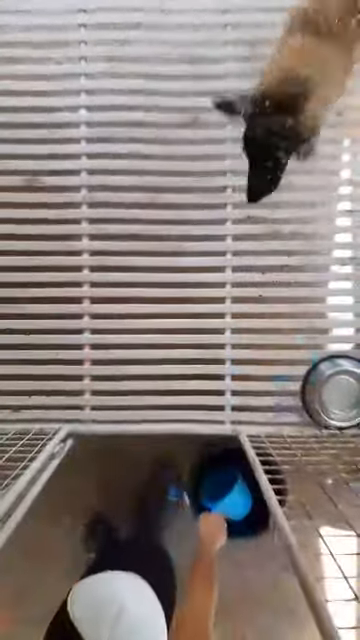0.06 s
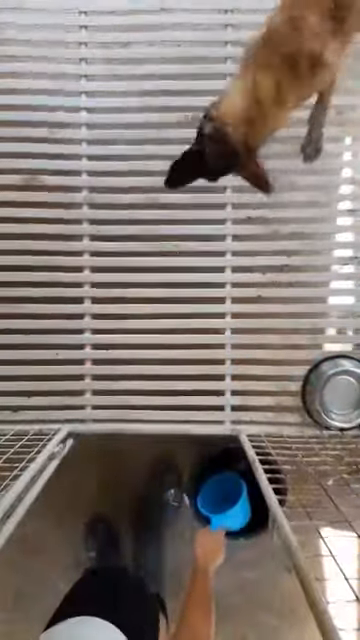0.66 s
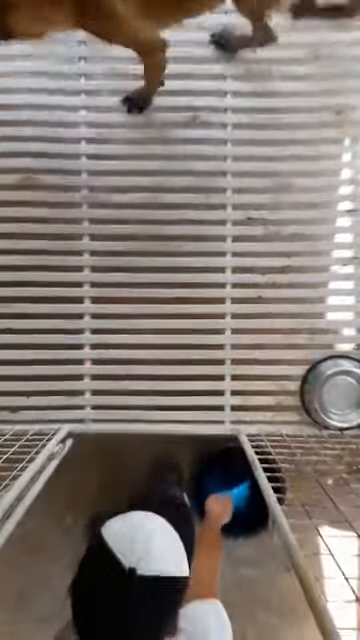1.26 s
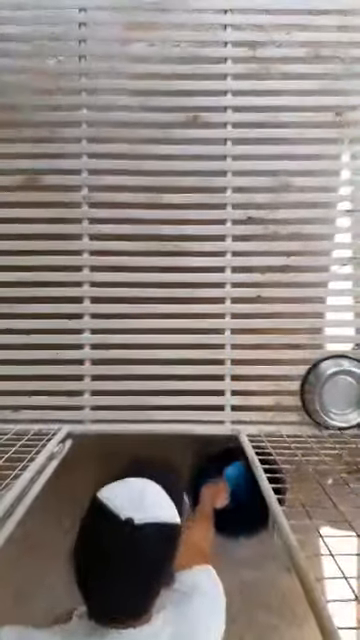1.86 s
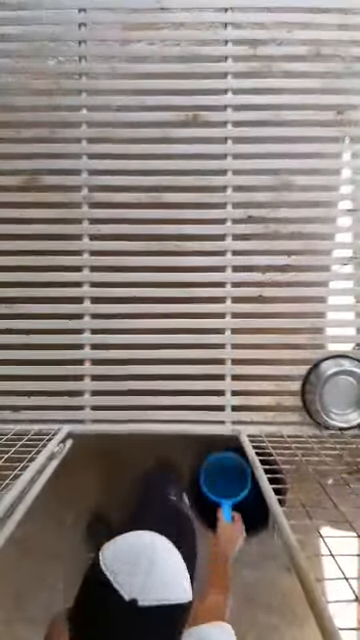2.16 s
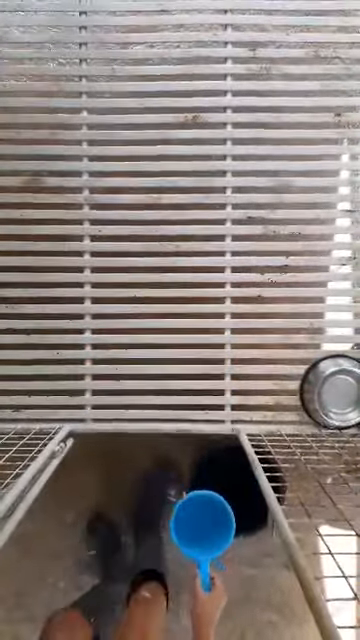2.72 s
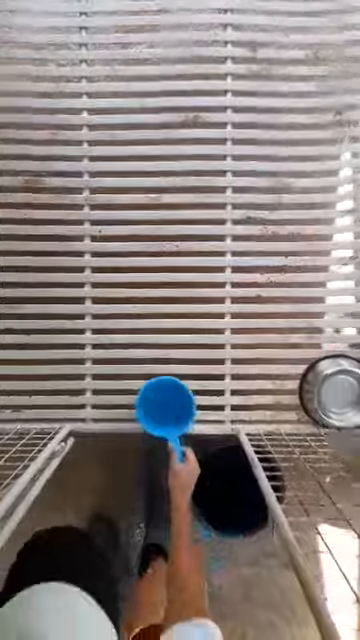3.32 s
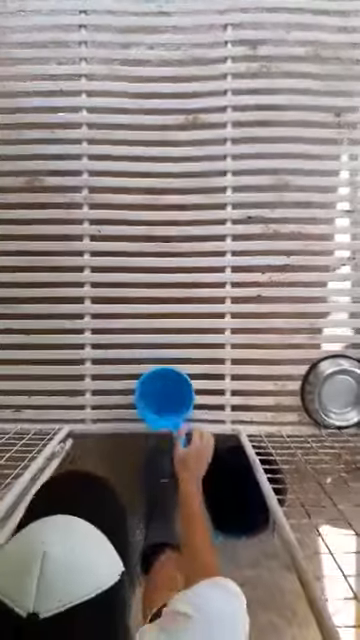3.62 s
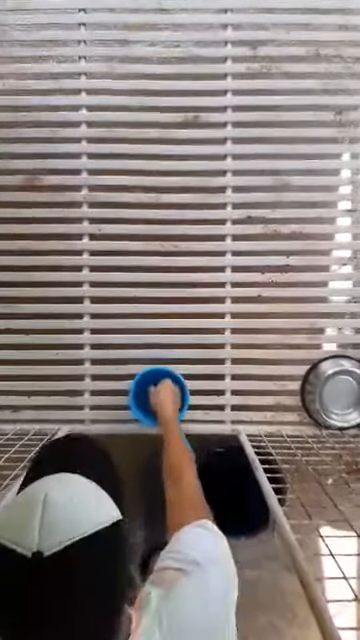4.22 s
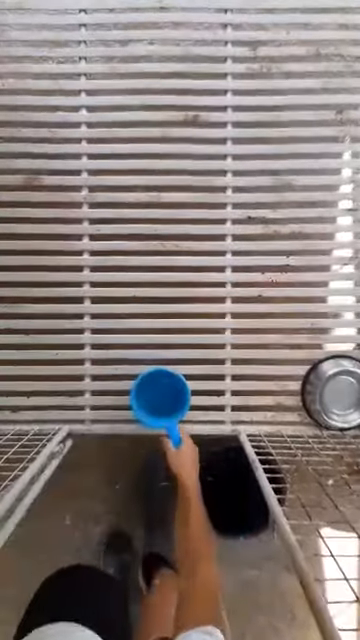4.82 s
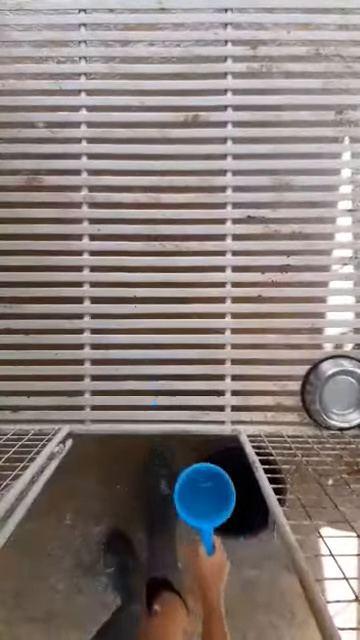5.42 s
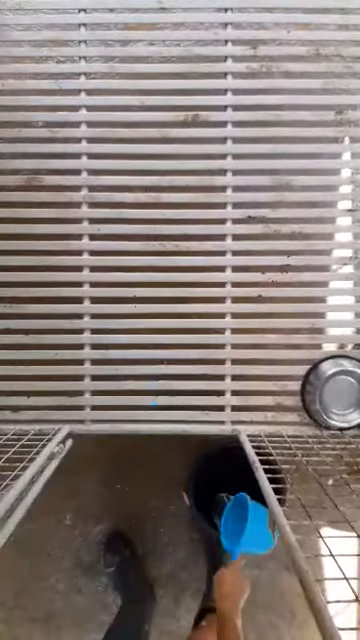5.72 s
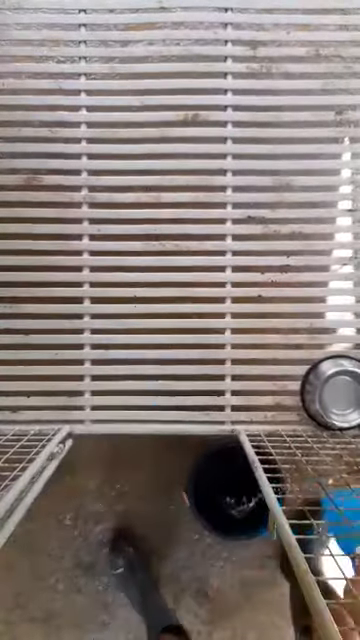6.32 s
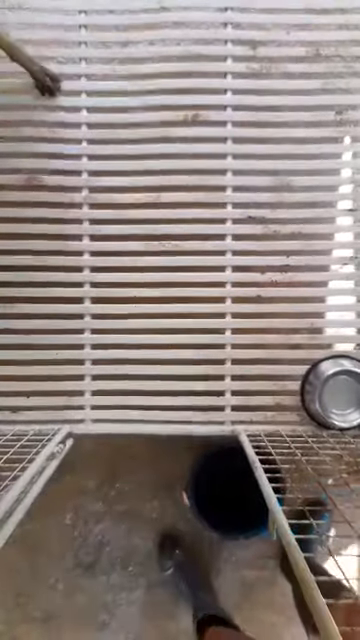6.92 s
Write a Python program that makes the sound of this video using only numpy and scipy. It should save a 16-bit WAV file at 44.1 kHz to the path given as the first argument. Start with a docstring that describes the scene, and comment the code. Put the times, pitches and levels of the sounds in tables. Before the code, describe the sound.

Close by in a roofed outdoor kennel, a dog barks once after a run of dry taps and trails into a whine. Water slops softly as a plastic scoop dips into a bucket. Two sharp barks follow, then a brief scrape and faint panting. Two more barks come as thrown water spatters, the scoop knocks and soft steps thud on the slatted floor. A phone's stereo microphones catch a low, wavering hum underneath.

```python
"""A roofed outdoor kennel, heard on a phone's stereo microphones, close to a dog that yelps five times.
Each bark leaps to a clean tone and breaks into a rasp; a whine trails the first, and the walls ring.
Someone scoops water from a bucket: bubbles slop, the plastic scoop knocks and scrapes, a throw spatters.
Around them are rapid dry taps, faint panting, scuffs and steps on the slatted floor, and, under the
open air, a low, wavering hum."""
import sys
import numpy as np
from scipy import signal
from scipy.fft import rfft, irfft, next_fast_len
from scipy.io import wavfile
from scipy.ndimage import uniform_filter1d, minimum_filter1d

SR = 44100
rng = np.random.default_rng(int(sys.argv[2]) if len(sys.argv) > 2 else 0)


def dump_mix(stems):
    """Bounce the given channels to the path in sys.argv[1] as a 16-bit WAV at rate SR."""
    frames = np.atleast_2d(stems).T  # one column per channel
    limited = np.clip(frames, -1, 1)  # hard clip at full scale
    pcm = np.round(limited * 32767).astype(np.int16)
    wavfile.write(sys.argv[1], SR, pcm)


N = 307377
T = np.arange(N) / SR
SIDES = np.array([[1], [-1]])  # left and right microphone

# resonances of the dog's throat and muzzle (frequency [Hz], gain [dB])
THROAT = [(400, -16.5), (620, -8), (820, -7), (1050, 0), (1380, -4), (1650, -2.5), (1900, -1.5),
          (2250, -4.5), (2550, -0.5), (2850, -3.5), (3150, -20.5), (3450, -14), (3750, -28.5),
          (4200, -27.5), (4800, -38), (6800, -26.5), (8500, -43.5), (11200, -22), (14000, -45.5)]


def undb(db):
    """Decibels to gain."""
    return 10 ** (np.asarray(db) / 20)


def unit(x):
    """Scale to rms 1."""
    return x / np.sqrt(np.mean(np.abs(x) ** 2) + 1e-20)


def blend(a, b, share):
    """From a to b as share goes from 0 to 1."""
    return a + (b - a) * share


def ease(t, middle, length):
    """A smooth step from 0 to 1."""
    return .5 + .5 * np.sin(np.pi * np.clip((t - middle) / length, -.5, .5))


def curve(rows, t=T):
    """Each column of a table, joined by straight lines in time."""
    s, *columns = np.transpose(rows)
    return [np.interp(t, s, c) for c in columns]


def read(points, hz):
    """A table over frequency, read on a log axis."""
    f, value = np.transpose(points)
    return np.interp(np.log(np.maximum(hz, 1)), np.log(f), value)


def shape(x, points):
    """Pass a sound through a response of (frequency [Hz], gain [dB]) points."""
    size = next_fast_len(x.shape[-1])
    gain = undb(read(points, np.fft.rfftfreq(size, 1 / SR)))
    return irfft(rfft(x, size) * gain, size)[..., :x.shape[-1]]


def colour(x, points):
    """Shape a sound's spectrum; rms 1."""
    return unit(shape(x, points))


def flutter(hz, size):
    """Random complex motion slower than hz; rms 1."""
    f = np.fft.rfftfreq(SR // 2, 1 / SR)
    real, imag = irfft(rfft(rng.standard_normal((2, SR // 2))) / (1 + (f / hz) ** 8))[:, :size]
    return unit(real + 1j * imag)


def walk(rate):
    """Random levels, rate of them a second, joined smoothly; rms 1."""
    size = int(SR / rate)
    knots = rng.standard_normal(N // size + 2)
    joined = np.interp(np.arange(N) / size, np.arange(len(knots)), knots)
    return unit(uniform_filter1d(joined, size // 2))


def wavering_phase(hz, depth, waver_hz, size):
    """Phase of an oscillation whose pitch strays at random around hz."""
    return 2 * np.pi * np.cumsum(hz * (1 + depth * flutter(waver_hz, size).real)) / SR


def stereo_noise(side_db, size=N):
    """Noise at the two microphones; side_db sets its width, as side against mid."""
    mid, side = rng.standard_normal((2, size))
    return unit(mid + undb(side_db) * SIDES * side)


def add(out, s, x):
    """Mix a short sound in at s seconds."""
    start = max(int(s * SR), 0)
    out[:, start:start + x.shape[-1]] += x[..., :N - start]


def ringing(modes, t):
    """Damped modes after a blow, each starting at its own phase."""
    return sum(undb(db - 60 * t / t60) * np.sin(2 * np.pi * (hz * t + rng.random()))
               for hz, db, t60 in modes)


def bursts(rows, spectrum, rise_s, gain_db, grain_db):
    """Each contact is a clump of grainy noise that swells and dies away."""
    envelope = np.zeros(N)
    for s, db, length_s in rows:
        age = np.maximum(T - s + rise_s, 0)
        swell = 1 - np.exp(-(age / rise_s) ** 2)
        envelope += undb(db + gain_db) * swell * np.exp(-np.minimum(2 * age / length_s, 40))
    return envelope * colour(stereo_noise(-0.86) * undb(grain_db * walk(650)), spectrum)


def low_tones(levels, modes, gain_db, waver_db):
    """Steady tones that waver in pitch and strength."""
    tones = 0
    for hz, width_hz, db in modes:
        phase = 2 * np.pi * np.cumsum(hz + width_hz / 2 * walk(30)) / SR
        tones = tones + undb(db + waver_db * walk(25)) * np.sin(phase)
    return unit(tones) * undb(curve(levels)[0] + gain_db)


def hum(throb_db=1.5, first_throb_s=.12, throb_gap_s=.246):
    """An evenly throbbing hum over a deeper drone, the same at both microphones."""
    # swell of the hum and of the drone (time [s], relative level [dB])
    hum_levels = [(0, -44.5), (.75, -44), (1.05, -35.5), (1.7, -39.5), (2.5, -52.5), (2.85, -42.5),
                  (3.05, -48.5), (4.2, -45.5), (5.25, -45), (5.9, -58.5), (6.12, -40.5), (6.97, -50.5)]
    drone_levels = [(0, -50), (.85, -52), (1.5, -44), (2.8, -45.5), (3.7, -59.5), (4.9, -50), (5.8, -67),
                    (6.65, -55)]
    # their tones (frequency [Hz], width of the waver [Hz], relative level [dB])
    hum_modes = [(108, 19, 2.5), (300, 12, -21)]
    drone_modes = [(68, 16, 0)]
    throb = undb(throb_db * np.cos(2 * np.pi * (T - first_throb_s) / throb_gap_s))
    upper = throb * low_tones(hum_levels, hum_modes, gain_db=2.13, waver_db=3)
    return upper + low_tones(drone_levels, drone_modes, gain_db=-2, waver_db=1.5)


def open_air(air_gain_db=6):
    """A wide bed of outdoor air, with a thin high hiss that comes and goes."""
    # swell of the air and of the hiss (time [s], relative level [dB])
    air_levels = [(0, -54.5), (1.2, -51), (1.65, -58.5), (2, -52), (2.3, -59), (3.2, -53.5), (3.7, -66),
                  (4.3, -61), (4.8, -63), (5.6, -59), (6.4, -75.5), (6.97, -47)]
    hiss_levels = [(0, -73.5), (1.8, -67.5), (2.8, -59.5), (3.4, -72), (4.5, -66.5), (5.6, -59), (5.9, -64),
                   (6.97, -90)]
    # spectra of the air and of the hiss (frequency [Hz], gain [dB])
    air_colour = [(240, -8), (450, -7.5), (700, -6), (1200, -8.5), (2200, -9), (3200, -14.5), (4500, -18.5),
                  (6700, -18), (8300, -30), (11000, -24), (13000, -33.5)]
    hiss_colour = [(8400, -19.5), (9300, -6), (10200, -13), (12500, -21.5)]
    air = colour(stereo_noise(1.5) * undb(3.3 * walk(51)), air_colour)
    hiss = colour(stereo_noise(-0.9), hiss_colour)
    return air * undb(curve(air_levels)[0] + air_gain_db) + hiss * undb(curve(hiss_levels)[0])


def scuffing(rise_s=0.023, rest_db=-60):
    """Paws and feet rub the slats: each dull scuff swells quickly and dies away, over a faint rumble."""
    # scuffs (time [s], peak level [dB], length [s])
    scuffs = [(0.008, -47, 1.8), (0.52, -38.5, 1.2), (0.823, -35.5, 1.48), (1.773, -45, 0.81),
              (2.083, -39, 0.2), (2.638, -47, 0.58), (3.311, -40.5, 0.65), (4.047, -45.5, 1.43),
              (6.049, -45, 3.2), (6.403, -37, 0.59), (6.54, -44, 0.33), (6.908, -39, 0.34)]
    # spectrum of the scuffed slats (frequency [Hz], gain [dB])
    slat_colour = [(25, -19.5), (50, -5.5), (90, -10), (140, -5), (175, -8.5), (240, -5.5), (300, -1.5),
                   (350, -10.5), (430, -15.5), (600, -12.5), (1100, -24), (2200, -54.5)]
    power = undb(rest_db) ** 2
    for s, db, length_s in scuffs:
        decay = np.exp(-2 * np.maximum(T - s, 0) / length_s)
        power = power + (undb(db) * ease(T, s, rise_s) * decay) ** 2
    return colour(stereo_noise(-12) * undb(2 * walk(25)), slat_colour) * np.sqrt(power)


def tapping(body_s=0.021, click_s=0.018):
    """Each dry tap is a bright click on a hollow, rattling body."""
    # a rapid run, a few strays, a second run (time [s], relative body level [dB], click level [dB])
    taps = [(0.021, -26.5, -30), (.11, -26, -30.5), (0.195, -31.5, -31), (.281, -32.5, -33),
            (0.368, -28, -29.5), (0.449, -33.5, -30), (0.531, -35.5, -33.5), (.614, -33.5, -32),
            (0.696, -50, -35.5), (0.781, -29.5, -38.5), (1.089, -43, -37), (1.274, -39, -44),
            (1.513, -37.5, -46), (1.823, -34, -37.5), (2.108, -39, -40), (3.868, -58, -43.5),
            (6.594, -33.5, -32), (6.681, -52, -34.5), (6.771, -36.5, -35.5), (6.859, -48, -34)]
    # spectra of the body and of the click (frequency [Hz], gain [dB])
    body_colour = [(350, -11.5), (500, -1.5), (720, 2.5), (850, 0), (980, 3.5), (1120, -9), (1290, -1.5),
                   (1520, -4.5), (1900, -12.5), (2400, -15), (2750, -11), (4000, -33.5)]
    click_colour = [(1500, -25.5), (3500, -4), (4600, -3.5), (6500, -1), (7400, 0.5), (8600, -18),
                    (11500, -3.5), (13000, -11.5)]
    bodies = [(s, db, body_s) for s, db, _ in taps]
    clicks = [(s, db, click_s) for s, _, db in taps]
    return (bursts(bodies, body_colour, rise_s=0.0063, gain_db=1.5, grain_db=2.5)
            + bursts(clicks, click_colour, rise_s=0.0087, gain_db=1, grain_db=2.5))


def steps(gain_db=-4, push_s=0.0082):
    """A soft, heavy tread sets the slats booming."""
    # footfalls (time [s], relative level [dB])
    footfalls = [(0.535, -48), (0.609, -35), (.73, -28), (6.515, -27.5), (6.574, -26), (6.605, -25),
                 (6.679, -33), (6.737, -33), (6.925, -29)]
    # modes of the slatted floor (frequency [Hz], relative level [dB], t60 [s])
    slat_modes = [(185, -9.5, .15), (229.4, -5, 0.37), (267, -6.5, .22), (284, 5, 0.083),
                  (334.8, -6.5, 0.083), (450, -7.5, .08), (584, -11.5, 0.13)]
    out, t = np.zeros((2, N)), np.arange(SR // 3) / SR
    for s, db in footfalls:
        add(out, s, undb(db + gain_db) * (1 - np.exp(-t / push_s)) * ringing(slat_modes, t))
    return out


def voice(t, hz, db, overtones_db, slope_db, rough, pan_db, lag_ms, edge_db, jitter=0.03):
    """Harmonics through the throat; as the folds go chaotic, the pitch jitters and each line spreads."""
    beat_hz, beat_db = 230.4, -4  # the two folds beat against each other and throw sidebands
    size, rough = len(t), np.clip(rough, 0, 1)
    phase = wavering_phase(hz, 0.0086 + jitter * np.sqrt(rough), 100, size)
    phase = phase + SIDES * np.pi * hz * lag_ms / 1000
    beat = wavering_phase(beat_hz, .25, 36, size)
    source = 0
    for k in np.arange(1, 9):
        spread_hz = 170 * k ** .6
        upper, lower = 2 * np.pi * rng.random(2)
        sidebands = np.exp(1j * (upper + beat)) + 0.45 * np.exp(1j * (lower - beat))
        # the rasp reaches the two microphones by different paths
        chaos = unit(undb(beat_db) * sidebands + flutter(spread_hz, size)
                     + SIDES * flutter(spread_hz, size))
        share = np.tanh(0.8 * k * rough)
        harmonic = np.imag((np.sqrt(1 - share ** 2) + share * chaos) * np.exp(1j * k * phase))
        # standing waves favour one microphone at the fundamental; overtones slope per octave
        strength = undb(SIDES * pan_db / 2 if k == 1 else overtones_db + slope_db * np.log2(k / 2))
        source = source + np.sqrt(2) * strength * harmonic
    # air rushing past the teeth (frequency [Hz], gain [dB])
    breath_colour = [(700, -19.5), (1700, -19), (2300, -4), (3400, -6), (7000, 4), (13000, -6)]
    # it escapes once a cycle, more of it when the voice is rough and the mouth wide
    breath = colour(stereo_noise(-1, size) * (1 + np.cos(phase)), breath_colour)
    source = source + undb(overtones_db / 2 - 2) * np.sqrt(rough) * breath
    # the muzzle's high edge, strongest when the dog faces the microphone (frequency [Hz], gain [dB])
    edge = [(4160, 0), (4340, edge_db), (4880, edge_db), (5420, 0)]
    return shape(shape(source * signal.windows.tukey(size, .05) * undb(db), THROAT), edge)


def rasp(t, db, second_hz, second_db, puff_hz=115, air_db=-10.5):
    """In the broken voice one fold sings a pitch of its own, and air tears through in uneven puffs."""
    # spectrum of the hoarse air (frequency [Hz], gain [dB])
    hoarse_colour = [(600, -24), (1100, -10), (1500, 2), (1850, -9), (2250, 5), (2450, -0.5), (2750, 1),
                     (3100, -8), (3450, 1.5), (3800, -12), (7000, -5), (13000, -10.5)]
    size = len(t)
    phase = wavering_phase(second_hz, .04, 90, size)
    second = np.sqrt(2) * np.imag(np.exp(1j * phase) * unit(1 + .5 * SIDES * flutter(60, size)))
    puffs = unit(1 + 0.55 * np.cos(wavering_phase(puff_hz, .3, 50, size)))
    air = colour(stereo_noise(-1.5, size), hoarse_colour)
    source = (undb(second_db) * second + undb(air_db) * air) * puffs
    return shape(source * undb(db) * signal.windows.tukey(size, .05), THROAT)


def slide_roughness(hz, most=.27, full_hz_per_s=7000):
    """A fast slide of pitch cracks the voice."""
    speed = np.abs(uniform_filter1d(np.gradient(hz), SR // 100)) * SR
    return most * np.minimum(speed / full_hz_per_s, 1) ** 2


def bark(attack_s, leap_s, break_s, release_s, glide_s, opening_hz, held_hz, rasp_hz, db,
         opening_db, rasp_rough, second_hz, second_db, pan_db, lag_ms, edge_db):
    """The pitch leaps, the mouth narrows to a clean tone, then the voice breaks, sags and fades."""
    climb_hz_per_s, sag_hz_per_s, fade_db_per_s = 3600, 660, 331
    breaking_s, tail_s = 0.009, 0.031
    t = np.arange(1, (release_s + tail_s) * SR) / SR
    jaw = np.minimum(t / leap_s, 1)
    leapt = ease(t, leap_s, glide_s)
    narrowed = ease(t, leap_s + 0.02, 0.022)
    broken = ease(t, break_s, breaking_s)
    torn = ease(t, break_s + breaking_s / 2, 0.017)  # the rasp spreads through the voice
    fading_s = np.maximum(t - release_s, 0)
    bright = min(undb(opening_db), 1)

    def stages(opening, held, rasping):
        """Carry a setting through the three stages of the bark."""
        return blend(blend(opening, held, narrowed), rasping, torn)

    climbing_hz = opening_hz + climb_hz_per_s * bright * leap_s * (jaw ** 2 - .5)
    hz = blend(blend(climbing_hz, held_hz, leapt), rasp_hz, broken) - sag_hz_per_s * fading_s
    # a hard bark starts pressed, rich in overtones; the highest come in only as the jaw opens
    overtones_db = stages(opening_db + 4 * bright * (1 - jaw ** 2), held=-15.5, rasping=-6)
    slope_db = stages(blend(-23, -2.5 - 22 * (1 - jaw), bright), held=-23, rasping=-1)
    rough = stages(0.087 * bright + slide_roughness(hz), held=0.0061, rasping=rasp_rough)
    # the same effort is shared between fundamental and overtones
    effort = np.minimum(t / attack_s, 1) ** 0.82 / np.hypot(1, 1.8 * undb(overtones_db))
    # a bright bark cracks at the leap; the break loses level, then a second push of breath follows
    crack_db = 1.5 * bright * np.exp(-((t - leap_s) / 0.0065) ** 2)
    push_db = 4.5 * np.exp(-((t - break_s - .021) / .011) ** 2)
    level_db = db + 20 * np.log10(effort) + crack_db + (push_db - 7.5) * broken - fade_db_per_s * fading_s
    held_pan_db = pan_db * leapt * (1 - broken)
    tone = voice(t, hz, level_db, overtones_db, slope_db, rough, held_pan_db, lag_ms, edge_db)
    return tone + torn * rasp(t, level_db, second_hz, second_db)


def whine(rows, crack_lag_s=.014):
    """A gliding tone that cracks just after its pitch drops fast."""
    t = np.arange(rows[0][0], rows[-1][0], 1 / SR)
    hz, db, overtones_db = curve(rows, t)
    earlier_hz = np.interp(t - crack_lag_s, t, hz)
    falling = np.gradient(earlier_hz) < 0
    rough = 0.019 + slide_roughness(earlier_hz) * np.where(falling, 1.4, .3)
    return voice(t, hz, db, overtones_db, slope_db=-29, rough=rough,
                 pan_db=1.5, lag_ms=0.03, edge_db=-2.5, jitter=0.012)


def dog():
    """Five barks and two whines, in the foreground."""
    # barks; the four stage times count from the start (start [s], attack [s], leap [s], break [s],
    # release [s], leap length [s], opening pitch [Hz], held pitch [Hz], rasp pitch [Hz],
    # relative level [dB], opening overtones [dB], rasp roughness [0-1], second pitch [Hz], its level [dB],
    # held tone left minus right [dB], lag of the right microphone [ms], muzzle edge [dB])
    barks = [(0.798, 0.028, 0.036, 0.086, 0.093, 0.077, 704, 1232, 1219, -6.5, -.5, 0.26, 979, -12, 2.5, -0.11, 8.5),
             (2.903, 0.0094, 0.026, 0.055, 0.088, 0.0021, 836, 1048, 1093, -8, 3, 0.4, 1328, -1.5, 10.5, 0.099, -13),
             (3.147, 0.041, 0.042, 0.059, 0.082, 0.057, 873, 989, 1036, -4.5, -17.5, 0.42, 1245, -11.5, -0.5, 0.15, -5),
             (5.713, 0.018, .04, 0.0753, 0.102, 0.01, 862, 1135, 1140, -7, 1.5, 0.36, 1332, 0, -10.5, -0.1, -0.5),
             (5.976, 0.031, 0.032, 0.049, 0.065, 0.051, 936, 979, 1039, -7.5, -18, 0.84, 1418, 0, -2, -0.068, -5)]
    # a loud arching yelp that trails off, and a soft rising whimper
    # (time [s], pitch [Hz], relative level [dB], overtones [dB])
    whines = [
        [(1.058, 786, -27, -21), (1.075, 848, -22, -12), (1.098, 1009, -13, -5.5), (1.13, 1008, -9, -4.5),
         (1.152, 843, -17.5, -6.5), (1.175, 661, -21, -15), (1.215, 658, -25, -18.5),
         (1.25, 645.4, -23.5, -2.5), (1.295, 582, -40, -19)],
        [(2.67, 344.3, -36, -33.5), (2.71, 424, -21.5, -33), (2.745, 483, -27.5, -23), (2.78, 590, -36.5, -10)],
    ]
    out = np.zeros((2, N))
    for s, *row in barks:
        add(out, s, bark(*row))
    for rows in whines:
        add(out, rows[0][0], whine(rows))
    return out


def bubble(hz, ring_s, glide=1.5):
    """A trapped bubble rings briefly and rises a little in pitch."""
    t = np.arange(SR // 16) / SR
    envelope = np.exp(-t / ring_s) * (1 - np.exp(-t / (0.074 * ring_s)))
    return np.sin(2 * np.pi * hz * t * (1 + glide * t)) * envelope


def slopping(gain_db=-3, spray_db=-7, lowest_hz=600, octaves=1.7, scatter_s=0.028, count=14):
    """Each slop in bucket and scoop traps one main bubble and a spray of tiny, quickly damped ones."""
    # slops (time [s], relative bubble level [dB], bubble pitch [Hz], relative spray level [dB])
    slops = [(1.504, -35, 585, -34.5), (1.784, -38, 731, -26), (1.813, -36, 650, -34),
             (1.843, -39, 642, -27), (1.887, -47, 895, -27), (1.974, -38, 1423, -47),
             (1.988, -30.5, 583, -48), (2.043, -36, 772, -37), (2.112, -26, 742, -39),
             (2.157, -39, 1700, -35), (2.448, -37, 630, -47), (3.92, -42, 794, -33),
             (3.941, -36.5, 670, -33), (4.039, -34, 672, -39), (5.429, -40, 684, -53),
             (6.409, -33, 735, -40)]
    out = np.zeros((2, N))
    for s, db, hz, tiny_db in slops:
        add(out, s, undb(db + gain_db) * bubble(hz, ring_s=0.0087))
        for late, pitch, side in rng.random((count, 3)):
            tiny_hz = lowest_hz * 2 ** (octaves * pitch)
            strength = undb(tiny_db + spray_db) * (1 - late / 2)
            pan = np.sqrt([[side], [1 - side]])
            add(out, s + scatter_s * late ** 2, strength * pan * bubble(tiny_hz, ring_s=2.8 / tiny_hz))
    return out


def scoop_knocks():
    """The plastic scoop knocks: short, sharp bursts."""
    # knocks (time [s], relative level [dB], length [s])
    knocks = [(1.9726, -34.5, 0.0097), (2.59, -48, 0.01), (6.3955, -37, 0.02), (6.429, -19.5, 0.0048)]
    # spectrum of a knock (frequency [Hz], gain [dB])
    knock_colour = [(350, -21), (750, -8.5), (1200, -6.5), (2200, -6), (3500, -5), (5000, -7), (6500, -6.5),
                    (8600, -20.5), (11000, -18.5), (13000, -28.5)]
    return bursts(knocks, knock_colour, rise_s=0.0012, gain_db=3.5, grain_db=5.5)


def scrape(ring_db=-1.5, rub_db=-2, grit_db=4):
    """A hand reaches into the scoop: a brief gritty rub sets a cluster of modes ringing."""
    # course of the rub (time [s], relative level [dB])
    levels = [(3.966, -51), (3.98, -42.5), (3.995, -39.5), (4.03, -44), (4.06, -52), (4.11, -72)]
    # what rings with it (frequency [Hz], relative level [dB], t60 [s])
    modes = [(1180, -13.5, 0.39), (1700, -12, .05), (2300, -11, 0.14), (2697, -15, 0.091), (2929, -13, .07),
             (3410, -3, 0.05), (4540, -4, 0.094), (4753, 1, 0.17), (5340, -7, 0.098), (5650, -2, .07),
             (6040, -14, 0.34), (6340, -1, 0.068), (7203, 3.5, 0.1), (7930, -1, 0.088), (8479, -25, .17),
             (10300, -5, .08), (11100, -8, .08), (12400, -9, .08)]
    # spectrum of the grit (frequency [Hz], gain [dB])
    grit_colour = [(1000, 9.5), (1800, 3), (3000, -0.5), (6800, -2.5), (8600, -11), (13000, -13)]
    grit = colour(stereo_noise(-0.72) * undb(grit_db * walk(300)), grit_colour)
    rub = grit * undb(curve(levels)[0]) * (T > levels[0][0]) * (T < levels[-1][0])
    t = np.arange(SR // 2) / SR
    response = unit(ringing(modes, t)) / np.sqrt(len(t))
    rung = signal.fftconvolve(rub, response[None], axes=1)[:, :N]
    return undb(ring_db) * rung + undb(rub_db) * rub


def panting(start_s=4.172, end_s=5.7, gap_s=.185, width_s=0.025, db=-54.5):
    """Short soft puffs through the open muzzle, at an even pace."""
    # spectrum of a pant (frequency [Hz], gain [dB])
    pant_colour = [(400, -10), (700, 5), (950, -10.5), (1250, -0.5), (1600, -9), (2000, -7.5), (2600, -14),
                   (4000, -14), (8000, -29.5)]
    puffs = sum(np.exp(-((T - s) / width_s) ** 2) for s in np.arange(start_s, end_s, gap_s))
    return undb(db) * puffs * colour(stereo_noise(-6.5), pant_colour)


def splash(gain_db=1, drops_db=3, gush_db=2.6, lowest_hz=1300, octaves=2.2, count=110):
    """Water thrown from the scoop: a dense spatter, with single drops pinging out of it."""
    # flow of the water (time [s], relative level [dB])
    levels = [(5.8, -57), (5.93, -49.5), (6.04, -43), (6.33, -45), (6.42, -46), (6.7, -50.5), (6.78, -78)]
    # spectrum of the spatter (frequency [Hz], gain [dB])
    spatter_colour = [(350, -36.5), (650, 2), (1400, 0), (2300, -2), (3500, -6), (5000, -8), (6700, -2),
                      (8600, -23), (11000, -13), (13000, -21.5)]
    start_s, end_s = levels[0][0], levels[-1][0]
    flow = undb(curve(levels)[0] + gain_db) * (T > start_s) * (T < end_s)
    spatter = stereo_noise(-0.64) * undb(drops_db * walk(1200) + gush_db * walk(46))
    pings = np.zeros((2, N))
    for when, pitch, side, faintness in rng.random((count, 4)):
        hz = lowest_hz * 2 ** (octaves * pitch)
        strength = undb(-3 - 4 * np.log(max(faintness, .03)))  # many soft drops, a few loud ones
        pan = np.sqrt([[side], [1 - side]])
        add(pings, blend(start_s, end_s, when), strength * pan * bubble(hz, ring_s=9 / hz))
    return flow * (colour(spatter, spatter_colour) + pings)


def kennel(x, early_db=-11, early_t60=0.42, tail_db=-19, build_s=0.0092):
    """The direct sound, a few distinct echoes, a quick cloud of scattered ones and a faint ring."""
    # decay of the ring (frequency [Hz], t60 [s])
    ring_times = [(200, 0.24), (1000, 0.59), (2500, 0.24), (6000, 0.73), (12000, 0.34)]
    # narrow resonances of the kennel (frequency [Hz], gain [dB], t60 [s])
    modes = [(938, -11.5, 0.1), (1142, -7.5, 0.39), (1190, -9.5, 0.45), (1380, -8.5, 0.29), (2040, -6, 0.1),
             (2240, 2.5, 0.29), (2380, -1, .3), (2490, -7.5, .22), (3420, 3.5, 0.28)]
    # echoes from floor, roof and walls (delay left [s], delay right [s], level [dB])
    echoes = [(.0013, 0.0023, -15.5), (0.0146, 0.0091, -9.5), (0.024, 0.033, -10)]
    t, f = np.arange(SR) / SR, np.fft.rfftfreq(SR, 1 / SR)
    nepers = np.log(1000)  # a fall of 60 dB
    noise = rfft(stereo_noise(1.9, SR))
    tail = 0
    for k, (_, t60) in enumerate(ring_times):
        band = read([(row[0], j == k) for j, row in enumerate(ring_times)], f)
        tail = tail + irfft(noise * band, SR) * np.exp(-nepers * t / t60) / np.sqrt(t60)
    early = stereo_noise(-1.1, SR) * np.exp(-nepers * t / early_t60) / np.sqrt(early_t60)
    build = 1 - np.exp(-t / build_s)
    response = (undb(early_db) * early + undb(tail_db) * tail) * np.sqrt(2 * nepers / SR) * build
    for hz, db, t60 in modes:
        decay = nepers / t60
        response += undb(db) * 2 * decay / SR * np.exp(-decay * t) * np.cos(2 * np.pi * hz * t)
    for left_s, right_s, db in echoes:
        response[0, int(left_s * SR)] += undb(db)
        response[1, int(right_s * SR)] += undb(db)
    return x + signal.fftconvolve(x, response, axes=1)[:, :N]


def duck_bass(x, sense_hz=1500, bass_hz=165, threshold_db=-26, recover_s=0.0084):
    """Gain control: loud, bright sound turns the bass down until it has passed."""
    bright = signal.sosfilt(signal.butter(4, sense_hz, "high", fs=SR, output="sos"), x.mean(axis=0))
    keep = np.exp(-1 / (recover_s * SR))
    power = signal.lfilter([1 - keep], [1, -keep], bright ** 2)
    gain = 1 / np.sqrt(1 + power / undb(threshold_db) ** 2)
    bass = signal.sosfiltfilt(signal.butter(4, bass_hz, fs=SR, output="sos"), x)
    return x - (1 - gain) * bass


def scene():
    """At the microphones: dog, water and small contacts ring in the kennel, over hum, floor and air."""
    foreground = dog() + panting() + tapping() + scoop_knocks() + slopping() + scrape() + splash()
    return kennel(foreground) + hum() + steps() + scuffing() + open_air()


def record(dry):
    """The phone ducks the bass, limits any peak over its ceiling just ahead of time, and cuts the top."""
    ceiling, hold, top_hz = .95, SR // 200, 13300
    ducked = duck_bass(dry)
    allowed = ceiling / np.maximum(np.abs(ducked).max(axis=0), ceiling)
    gain = uniform_filter1d(minimum_filter1d(allowed, 2 * hold), hold)
    return signal.sosfilt(signal.ellip(8, .2, 70, top_hz, fs=SR, output="sos"), ducked * gain)


dry = scene()
out = record(dry)
dump_mix(out)
```